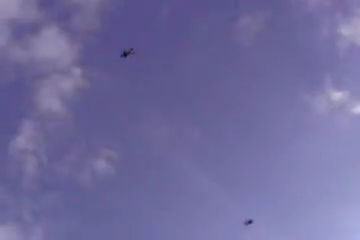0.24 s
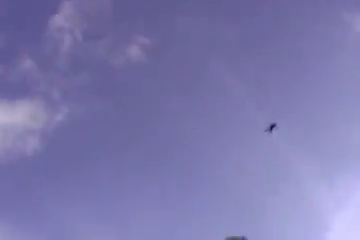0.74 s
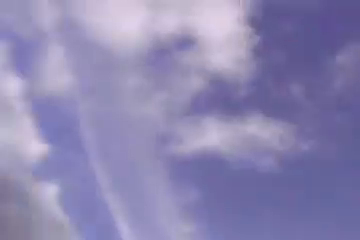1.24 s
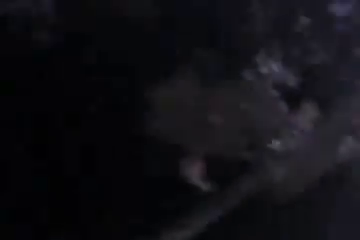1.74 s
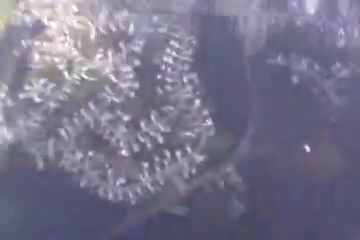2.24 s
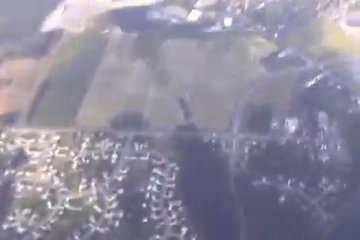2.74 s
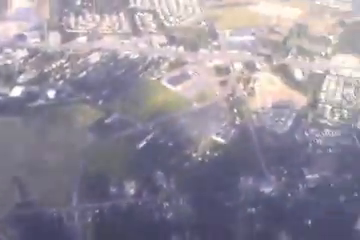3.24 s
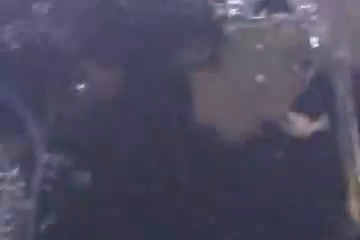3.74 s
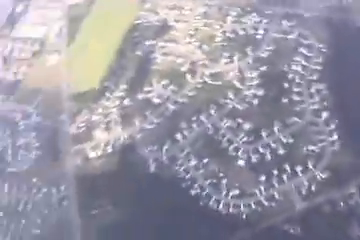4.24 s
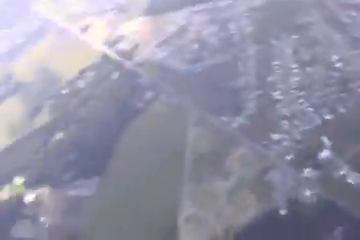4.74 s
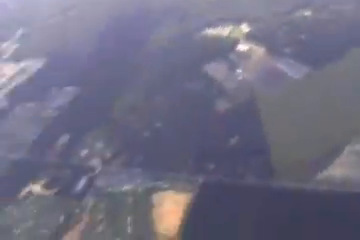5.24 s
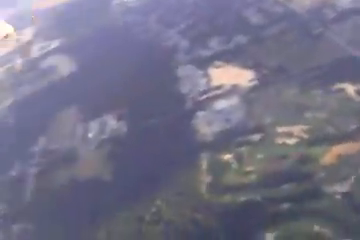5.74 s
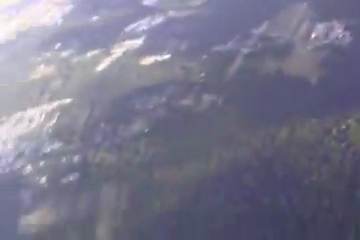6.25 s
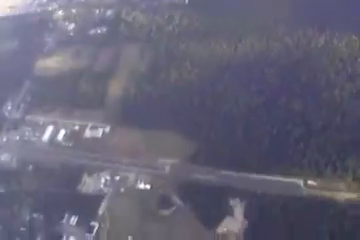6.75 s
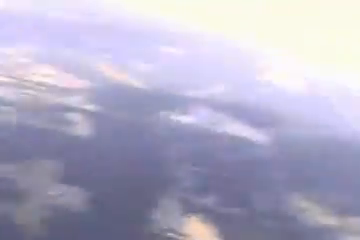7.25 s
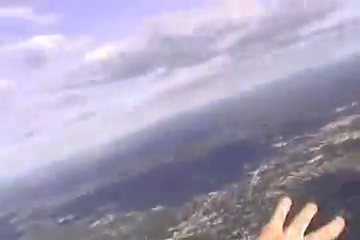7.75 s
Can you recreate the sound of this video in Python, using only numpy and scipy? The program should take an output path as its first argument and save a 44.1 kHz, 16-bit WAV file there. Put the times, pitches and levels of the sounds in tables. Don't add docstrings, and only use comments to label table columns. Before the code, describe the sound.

Wind in free fall, taken very close by two microphone ports on a skydiver's helmet, loud, overdriven and without pause. From 0 to 1.4 s it is a bright, dense rush and hiss with uneven flutter, grit and a few tiny clicks. Around 1.5 s the stereo image lurches as the head rolls; low thumps hit at about 1.7 and 1.8 s, the second hardest, and a breathy whistle near 1.9 s rises briefly, falls and fades by 2.15. Bright blasting air returns until 2.3 s, then darkens into a hollow roar that swells and shifts through 4.5 s. From about 4.75 s deep buffeting dominates, hiss mostly sheltered, with flat, distorted shoves, densest from 6 to 6.6 s. Near 7 s the rush opens up somewhat; from 7.6 s heavy low pounding returns and continues to the end at 8 s.

```python
import sys
import numpy as np
from scipy import signal
from scipy.fft import rfft, irfft, next_fast_len
from scipy.io import wavfile
from scipy.ndimage import uniform_filter1d, map_coordinates

SR = 44100
rng = np.random.default_rng(int(sys.argv[2]) if len(sys.argv) > 2 else 0)


def wrap_up_sound(samples):
    columns = np.atleast_2d(samples).T
    tamed = np.clip(columns, -1, 1)
    steps = np.round(tamed * 32767).astype(np.int16)
    wavfile.write(sys.argv[1], SR, steps)


def linear_from_db(decibels):
    return 10 ** (np.asarray(decibels, float) / 20)


N = 353241


def unit(x):
    return x / np.sqrt(np.mean(x ** 2) + 1e-20)


def curves(rows):
    s, *columns = np.transpose(rows)
    return [np.interp(np.arange(N) / SR, s, column) for column in columns]


def ruled(rows, control):
    x, *columns = np.transpose(rows)
    below = np.minimum(control - x[0], 0)
    values = []
    for column in columns:
        slope = (column[1] - column[0]) / (x[1] - x[0])
        values.append(np.interp(control, x, column) + slope * below)
    return values


def wobble(knots_per_s):
    knots = rng.standard_normal(int(N * knots_per_s / SR) + 4)
    return map_coordinates(knots, [np.arange(N) * knots_per_s / SR])


def coloured(x, points):
    size = next_fast_len(N + 8192)
    hz, db = np.transpose(points)
    log_hz = np.log(np.fft.rfftfreq(size, 1 / SR) + 1)
    gain = linear_from_db(np.interp(log_hz, np.log(hz), db))
    return irfft(rfft(x, size) * gain, size)[..., :N]


def noise(spectrum):
    return coloured(rng.standard_normal((2, N)), spectrum)


def eddies(noise_pair, alike, lumps_db, lumps_per_s):
    shared, opposed = unit(noise_pair)
    turn = np.arccos(np.clip(alike, -.99, .995)) / 2
    pair = np.cos(turn) * shared + np.sin(turn) * opposed * [[1], [-1]]
    return unit(pair * linear_from_db(lumps_db * wobble(lumps_per_s)))


# frequency in Hz, density in dB per Hz.
BUFFET_SPECTRUM = [(8, -13.5), (20, 0.5), (80, -0.5), (160, -11), (500, -45.5), (2000, -79)]


def buffet(alike):
    return eddies(noise(BUFFET_SPECTRUM), alike, lumps_db=1.0, lumps_per_s=9)


# multiple of the centre frequency, level in dB.
WAKE_HUMP = [(.1, -15), (.45, -5), (1, -1.5), (1.6, -5), (3.5, -23), (15, -79.5), (60, -110)]


def wake(centre_hz, alike):
    hz, s, z = signal.stft(rng.standard_normal((2, N)), SR, nperseg=2048)
    centre = np.interp(s * SR, np.arange(N), centre_hz)
    multiple, db = np.transpose(WAKE_HUMP)
    hump = linear_from_db(np.interp(np.log((hz[:, None] + 1) / centre), np.log(multiple), db))
    hump = hump / np.sqrt(np.mean(hump[(hz > 90) & (hz < 330)] ** 2, axis=0))
    roar = signal.istft(z * hump, nperseg=2048)[1][:, :N]
    return eddies(roar, alike, lumps_db=1.5, lumps_per_s=14)


# frequency in Hz, density in dB per Hz.
RUSH_SPECTRUM = [(100, -27), (330, -8.5), (550, 1.5), (800, 1), (1200, -5.5), (2500, -35), (12000, -53.5)]


def rush(alike):
    return eddies(noise(RUSH_SPECTRUM), alike, lumps_db=1.5, lumps_per_s=25)


# frequency in Hz, density in dB per Hz.
HISS_SPECTRUM = [(400, -24), (1100, 0), (2000, 0.5), (3200, -5.5), (5000, -16), (8000, -16), (16000, -28.5)]


def hiss(alike):
    return eddies(noise(HISS_SPECTRUM), alike, lumps_db=1.5, lumps_per_s=60)


# start in seconds, length in seconds, shelter gained,
# likeness gained, thump in dB.
WAKE_SWEEPS = [
    (1.46, .09, -.05, -.6, -3),
    (1.6, .07, .1, -.5, 0),
    (1.672, .07, .2, .2, 10),
    (1.745, .04, .16, .3, -2),
    (1.79, .088, .13, .4, 13),
    (1.88, .1, -.05, .3, -1),
]


def sweeps():
    t, edge_s = np.arange(N) / SR, 0.018
    total = 0
    for s, length_s, *gains in WAKE_SWEEPS:
        inside_s = np.minimum(t - s, s + length_s - t)
        gate = np.clip(inside_s / edge_s + .5, 0, 1)
        total = total + gate * np.array(gains)[:, None]
    return total


# time in seconds, shelter of the ports 0 to 1, wake eddy size in Hz,
# yaw 0 to 1.
HEAD = [(0, 0.08, 323, 0.4), (.95, 0.06, 314, .2), (1.3, 0.01, 300, 0.5), (2.17, 0, 320, 0.2),
        (2.45, 0.4, 260, 0), (2.85, 0.7, 229, .2), (3.25, .42, 300, 0.3), (3.65, .52, 241, .2),
        (4.2, .45, 279, .2), (4.75, 1, 167.4, 0.05), (5.85, 0.93, 169.3, 0.06), (6.1, 0.96, 137.3, .1),
        (6.38, 0.93, 130.6, 0.38), (6.6, 1, 186, 0.05), (6.95, .5, 237, 0.3), (7.52, 0.55, 227, 0.3),
        (7.6, 1, 131, 0.8), (8.01, 0.85, 130.6, 0.2)]
# shelter 0 to 1, then buffet, wake, rush and hiss in dB.
LEVELS = [(0, -28, -19, -12, -9.5), (.5, -15.5, -5, -10.5, -22), (1, -11.5, 1.5, -22.5, -27.5)]
ALIKE = [(0, 0.68, 0.6, 0.46), (.5, 0.898, 0.71, .3), (1, .96, .8, 0)]
SWING_DB = (3.1, 1.87, 1.5, 1.5)


def airflow():
    shelter, wake_hz, yaw = curves(HEAD)
    swept, matched, thump_db = sweeps()
    wake_hz = wake_hz / 2 ** (thump_db / 14)
    shelter = shelter + swept + 0.035 * wobble(knots_per_s=14)

    levels_db = [db + swing_db * wobble(knots_per_s=12)
                 for db, swing_db in zip(ruled(LEVELS, shelter), SWING_DB)]
    buffet_db, wake_db, rush_db, hiss_db = levels_db
    yaw_unlike = 0.39
    low, middle, high = [alike + matched - yaw_unlike * yaw for alike in ruled(ALIKE, shelter)]

    big_octaves = np.maximum(np.log2(172.8 / wake_hz), 0)
    buffet_db = buffet_db + thump_db + 11.5 * big_octaves
    wake_db = wake_db + thump_db - 16 * big_octaves
    large = linear_from_db(buffet_db) * buffet(low) + linear_from_db(wake_db) * wake(wake_hz, low)
    return large + linear_from_db(rush_db) * rush(middle) + linear_from_db(hiss_db) * hiss(high)


# time in seconds, pitch in Hz, level in dB.
STRAP_EDGE = [
    (1.86, 1550, -50),
    (1.878, 1600, -7),
    (1.93, 1850, -6.5),
    (2.0, 1650, -10),
    (2.08, 1550, -18),
    (2.15, 1500, -50),
]


def strap_edge():
    hz, db = curves(STRAP_EDGE)
    return linear_from_db(db) * wobble(knots_per_s=800) * np.sin(2 * np.pi * np.cumsum(hz) / SR)


# start in seconds, length in ms, direction -1 or 1.
SHOVES = [(4.815, 6.3, 1), (4.897, 5.8, -1), (5.14, 6.7, -1), (5.194, 6.5, 1), (5.245, 6.6, -1),
          (5.56, 6.9, 1), (6.032, 6.8, -1), (6.09, 6.5, -1), (6.215, 7.5, 1), (6.335, 7.8, -1),
          (6.366, 8.8, 1), (6.442, 8.2, 1), (6.605, 6.8, 1), (6.625, 8, -1), (7.697, 9.5, 1),
          (7.721, 5.6, -1), (7.755, 6.8, 1), (7.864, 8, -1), (7.93, 6.5, 1)]


def shoves():
    push, rim = np.zeros(N), round(.0012 * SR)
    for s, ms, direction in SHOVES:
        shape = np.pad(np.ones(round(ms * SR / 1000)), rim, constant_values=-1)
        push[round(s * SR) - rim:][:len(shape)] = direction * shape
    return linear_from_db(8) * uniform_filter1d(push, size=24)


def scene():
    return airflow() + shoves() + strap_edge()


def overload(x, drive_db, hard):
    rail = .46
    x = x * linear_from_db(drive_db)
    return x / (1 + np.abs(x / rail) ** hard) ** (1 / hard)


def grit(x, db, size, clean_bins):
    z = signal.stft(x, nperseg=size)[2]
    level = np.sqrt(np.abs(uniform_filter1d(np.abs(z) ** 2, size=size // 50, axis=1)))
    error = rng.standard_normal(z.shape) + 1j * rng.standard_normal(z.shape)
    error[:, :clean_bins] = 0
    return signal.istft(z + linear_from_db(db) * level * error, nperseg=size)[1][:, :N]


# frequency in Hz, limit in dB against the hiss.
DROP_MID = [(3000, -28), (5700, -12), (7000, -9), (8300, -6.5), (9000, -2), (9600, 2), (11000, 3)]
# frequency in Hz, limit in dB against the hiss.
DROP_SIDE = [(1500, -18), (3500, -3), (4700, 1), (5700, 5), (7000, 8), (8300, 9), (11000, 9)]


def thinned(pair, ragged_db):
    hz, _, z = signal.stft(pair, SR, window="cosine", nperseg=4096)
    hiss_band = z[:, (hz > 6000) & (hz < 7500)]
    hiss_level = np.sqrt(np.mean(np.abs(hiss_band) ** 2, axis=(0, 1)))
    hiss_level = hiss_level * (hiss_level / hiss_level.mean()) ** .25
    limit_db = np.array([np.interp(hz, *np.transpose(drop)) for drop in (DROP_MID, DROP_SIDE)])
    bands_db = ragged_db * unit(uniform_filter1d(rng.standard_normal(z.shape), size=32, axis=1))
    kept = np.abs(z) > hiss_level * linear_from_db(limit_db[..., None] + bands_db)
    return signal.istft(z * kept, window="cosine", nperseg=4096)[1][:, :N]


# time in seconds, port 0 or 1.
TICKS = [(.355, 1), (.422, 0), (.441, 1), (.703, 1), (.893, 1), (1.01, 1), (1.981, 1)]


def ticks():
    out = np.zeros((2, N))
    for s, port in TICKS:
        out[port, round(s * SR):][:3] += linear_from_db(-30.5) * np.array([-.5, 1, -.5])
    return out


# start in seconds, peak in dB, frequency in Hz.
SPLASHES = [(2.635, -34, 13300), (4.7382, -42, 13100), (4.8904, -43, 12600), (5.1942, -41, 12660),
            (5.2496, -39, 12300), (5.4905, -32, 13600), (5.5634, -62, 12500), (6.0059, -37, 12700),
            (6.1575, -35, 12100), (6.3416, -38, 12500), (6.3705, -53, 13500), (6.4504, -50, 11700),
            (7.051, -59, 12700), (7.5588, -47, 12400), (7.8103, -43, 12600), (7.9225, -51, 11800)]


def splashes():
    out, t = np.zeros((2, N + 400)), np.arange(400) / SR
    burst = np.exp(-((t - .003) / .0012) ** 2)
    for s, db, hz in SPLASHES:
        smooth = uniform_filter1d(uniform_filter1d(rng.standard_normal((2, 400)), size=16), size=16)
        ragged = 1 + 1.8 * smooth
        out[:, round(s * SR):][:, :400] += linear_from_db(db) * ragged * burst * np.sin(2 * np.pi * hz * t)
    return out[:, :N]


def sharp_edges():
    marks = np.zeros(N)
    marks[[round(row[0] * SR) for row in list(SPLASHES) + list(SHOVES)]] = 1
    return np.clip(np.convolve(marks, np.hanning(1200), "same") * 1.5, 0, 1)


def band_limit(x):
    return signal.sosfilt(signal.butter(12, 19000, fs=SR, output="sos"), x)


# frequency in Hz, level in dB.
RECORDER_COLOUR = [(20, 0), (1500, 0), (3000, -1), (6000, -1.5), (8000, -4), (9000, -6.5), (10300, -12),
                   (11300, -90)]


def record(dry):
    left, right = overload(dry, drive_db=15.0, hard=8.4)
    pair = np.array([left + right, left - right]) / 2
    gritty = grit(pair, db=-13.0, size=256, clean_bins=3)
    gritty = grit(gritty, db=-6.5, size=1024, clean_bins=70)
    sharp = sharp_edges()
    gritty = gritty + .6 * sharp * (pair - gritty)
    full = coloured(gritty, RECORDER_COLOUR)
    thin = thinned(full, ragged_db=5.5)
    mid, side = thin + 0.48 * sharp * (full - thin)
    mix = np.array([mid + side, mid - side]) + ticks() + splashes()
    return band_limit(np.clip(mix, -1, 1))


dry = scene()
out = record(dry)
wrap_up_sound(out)
```